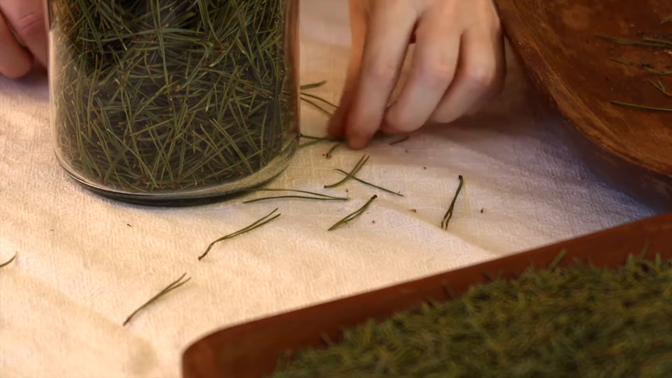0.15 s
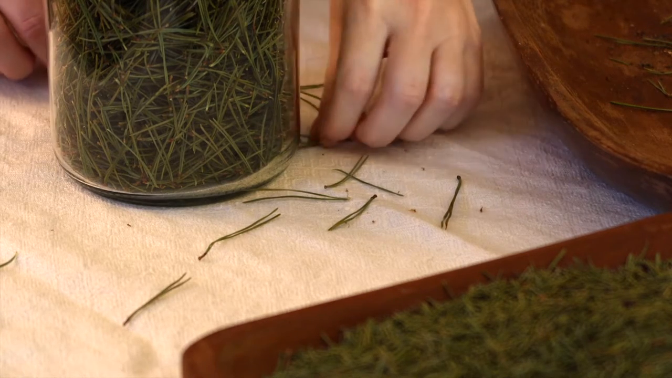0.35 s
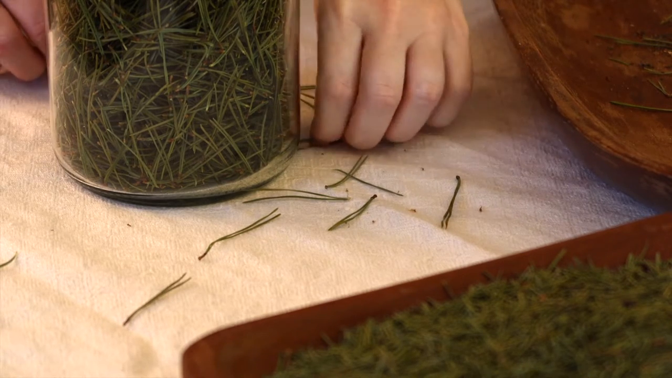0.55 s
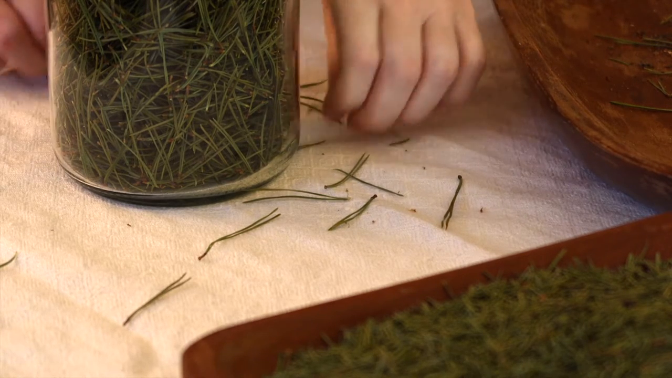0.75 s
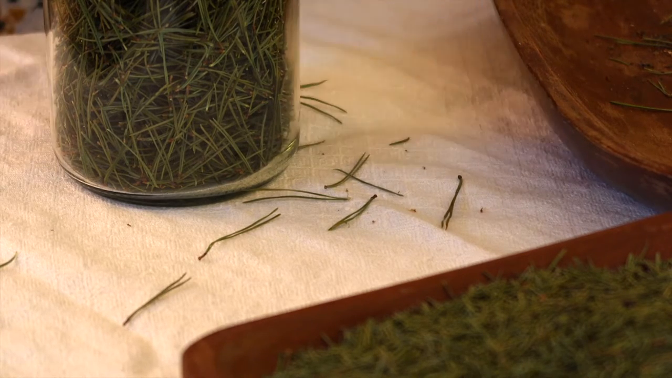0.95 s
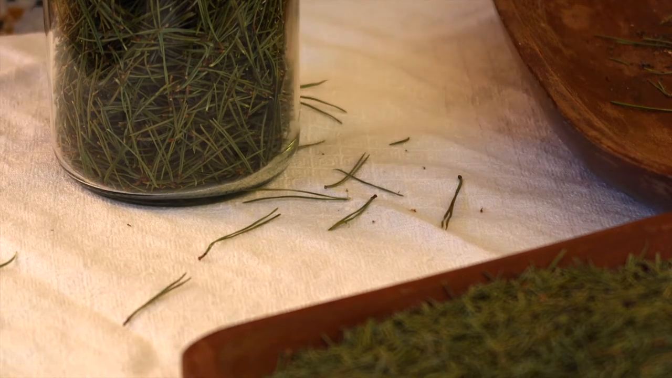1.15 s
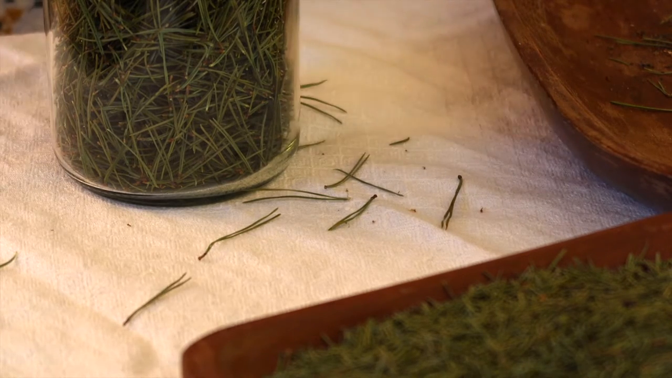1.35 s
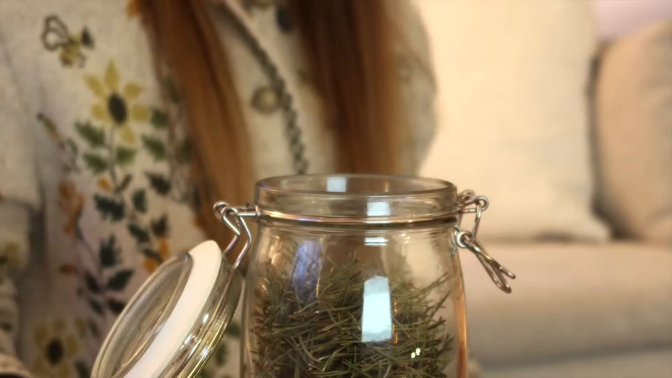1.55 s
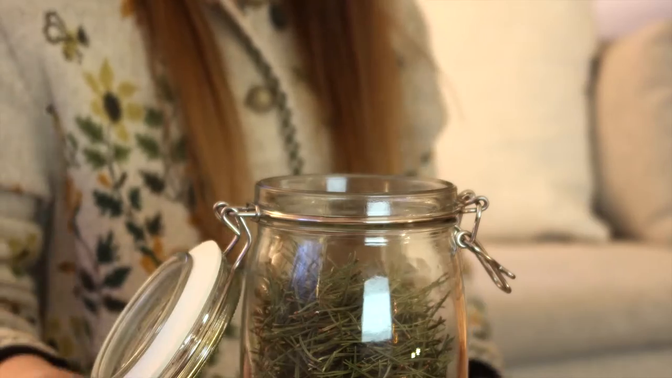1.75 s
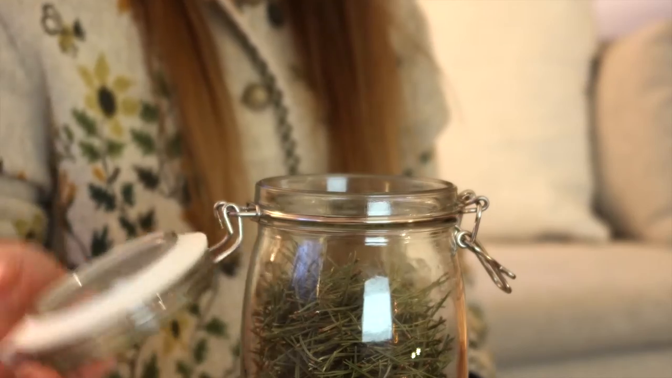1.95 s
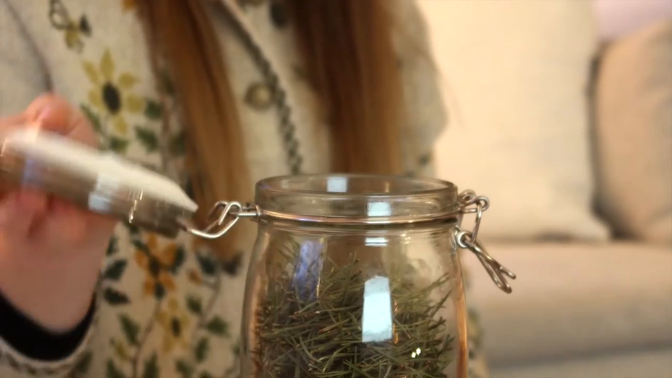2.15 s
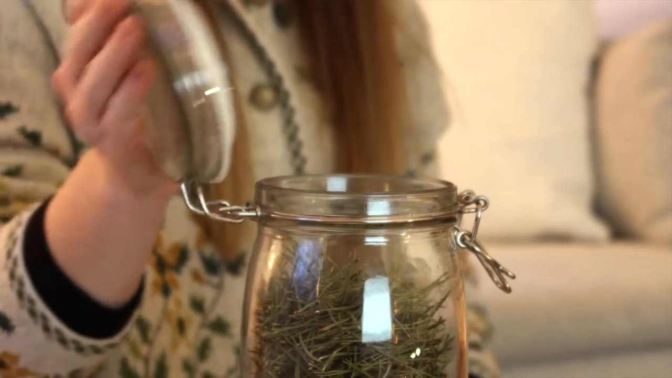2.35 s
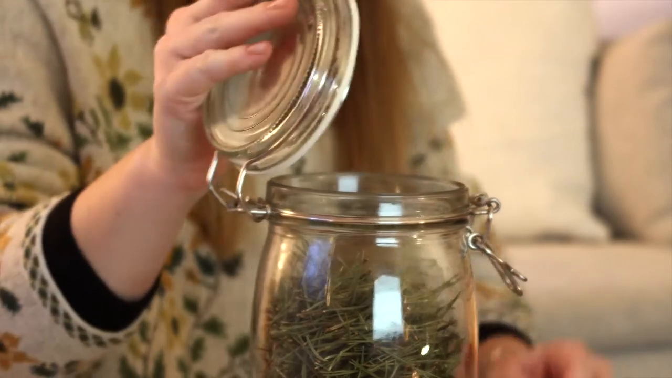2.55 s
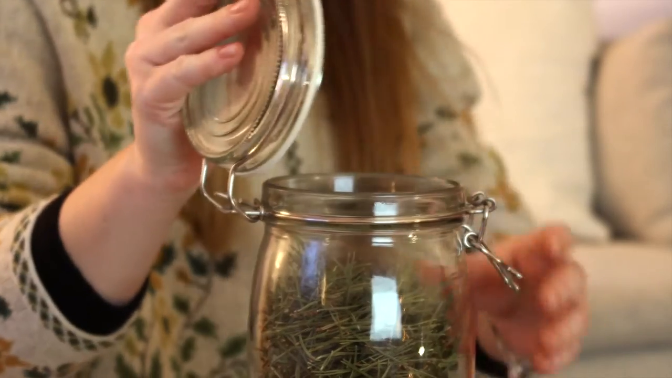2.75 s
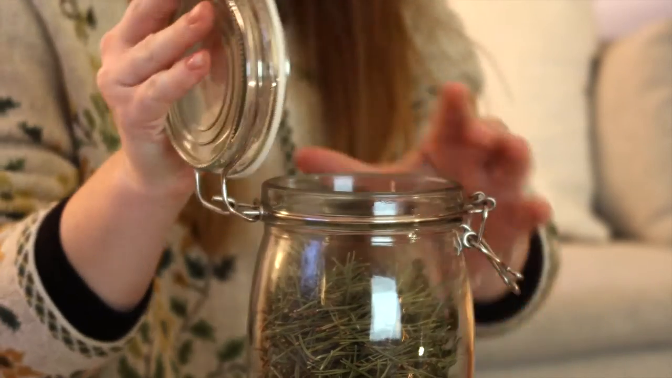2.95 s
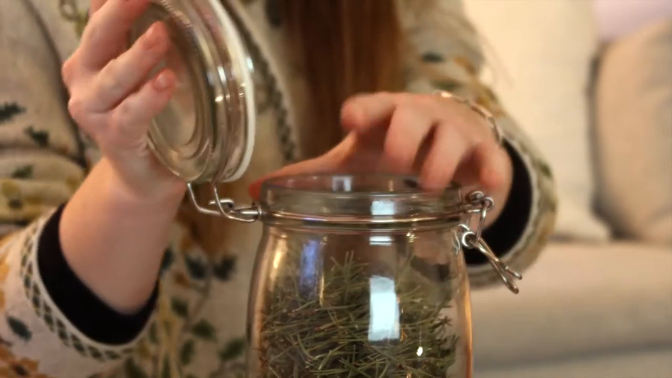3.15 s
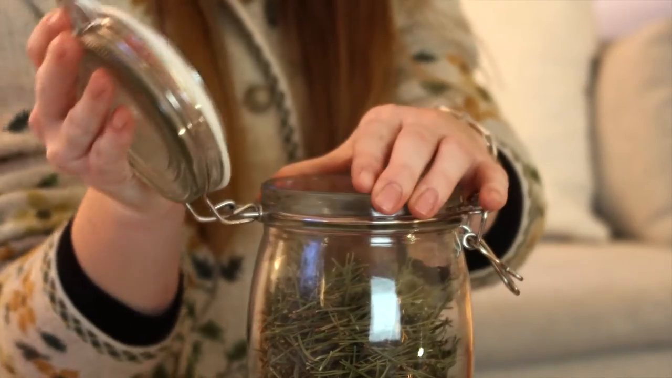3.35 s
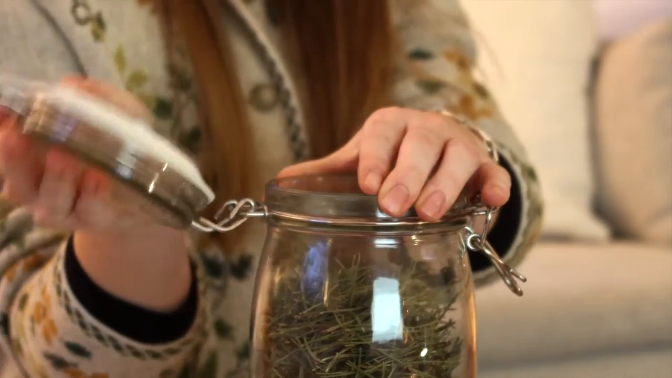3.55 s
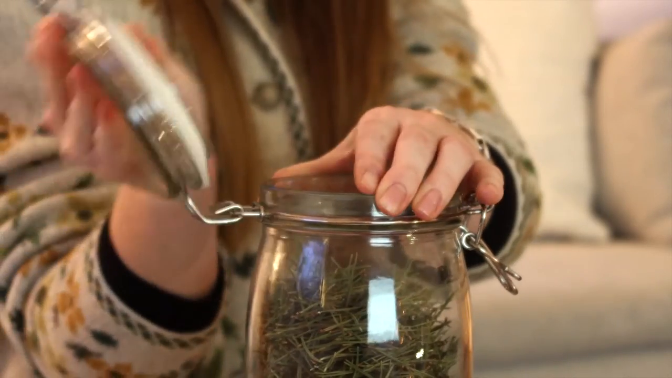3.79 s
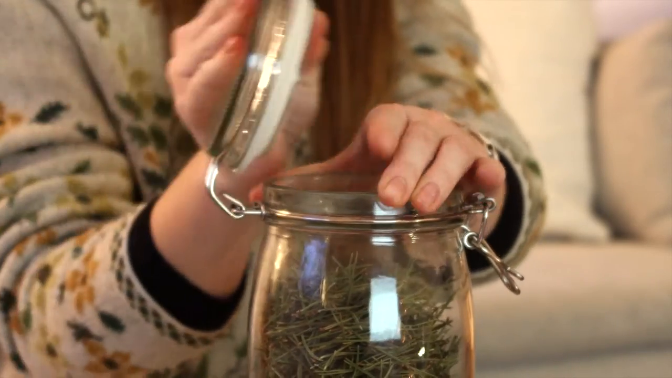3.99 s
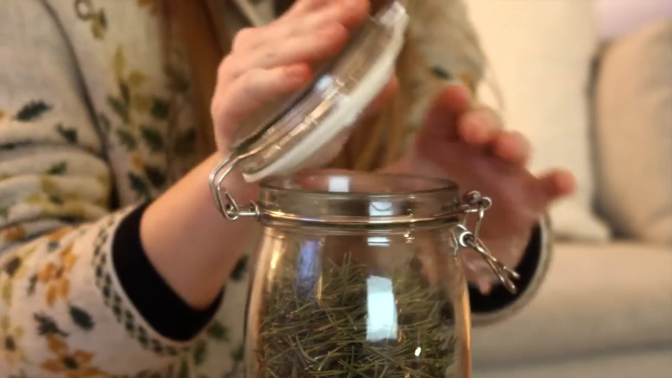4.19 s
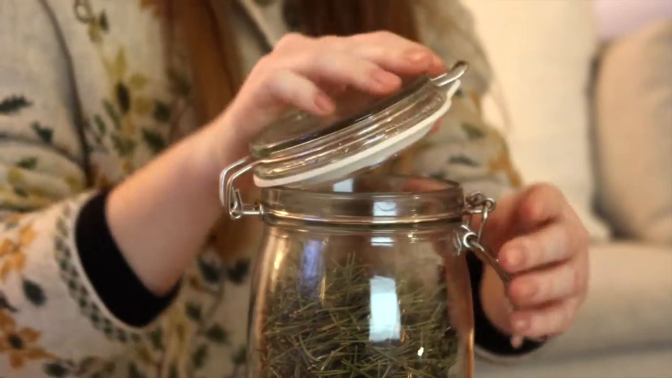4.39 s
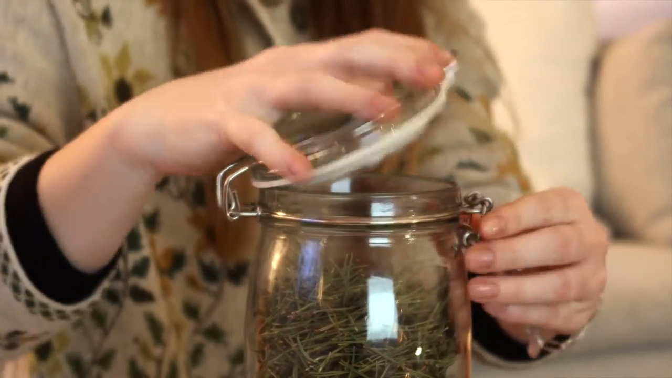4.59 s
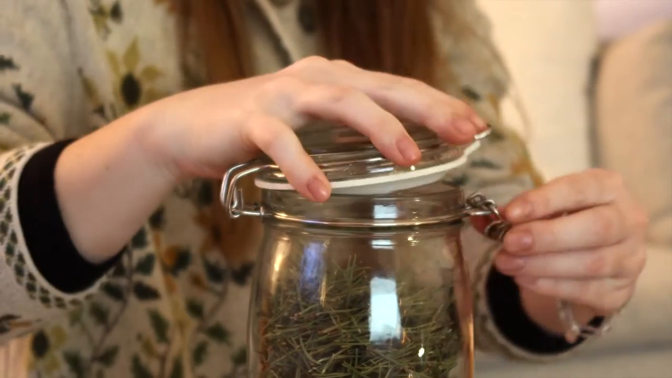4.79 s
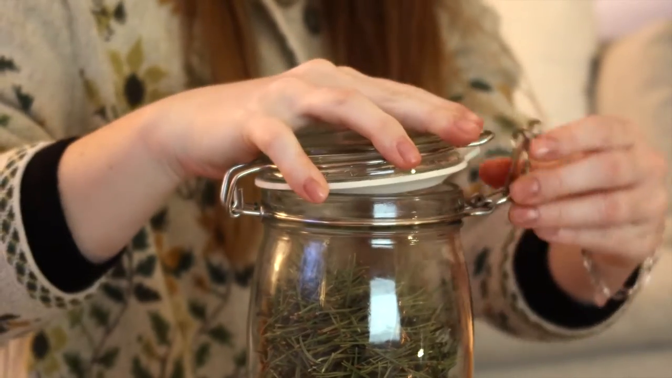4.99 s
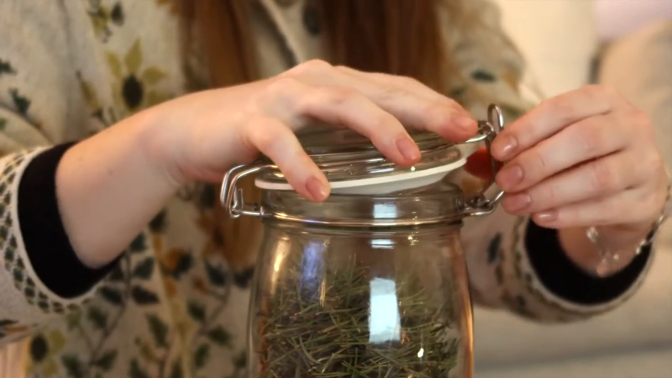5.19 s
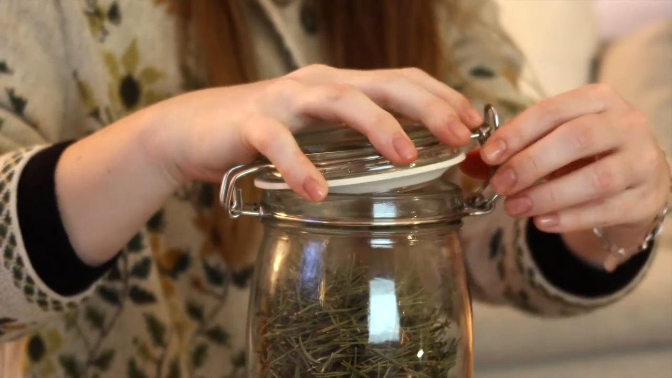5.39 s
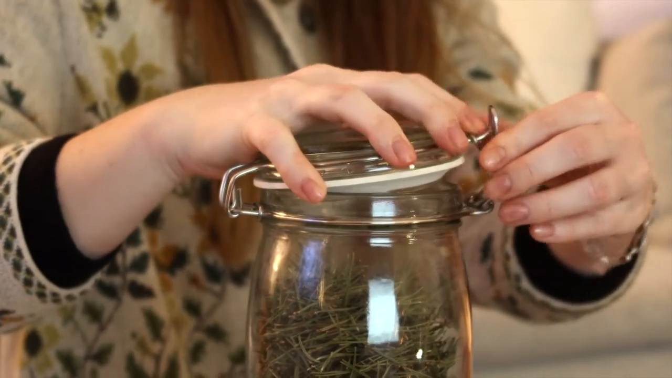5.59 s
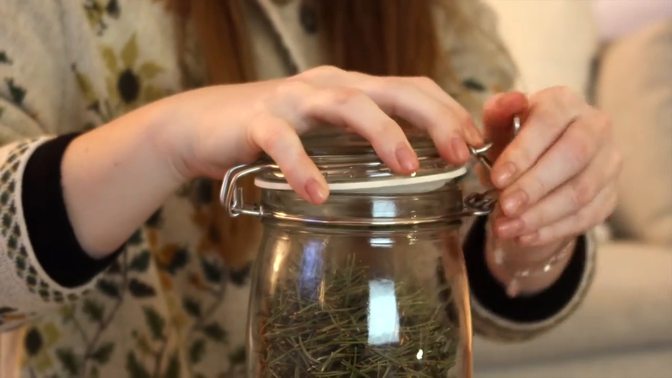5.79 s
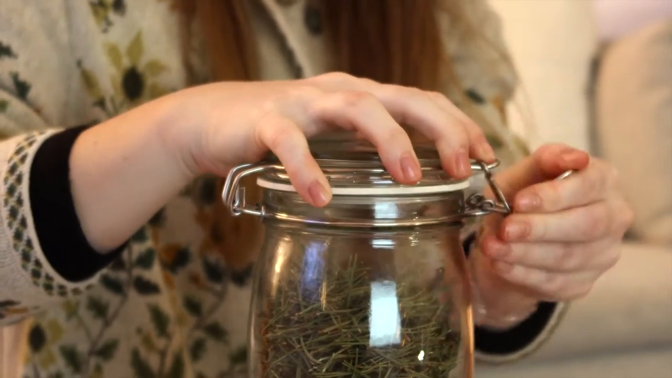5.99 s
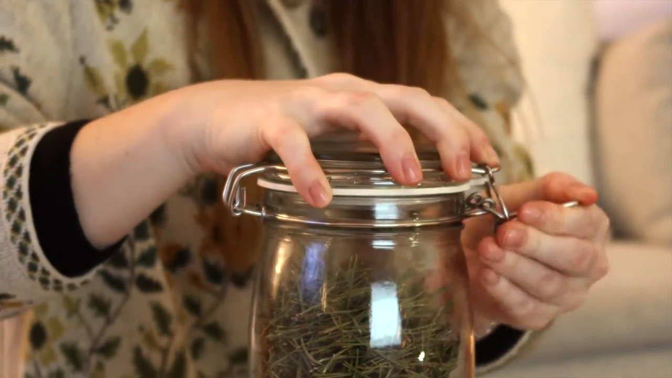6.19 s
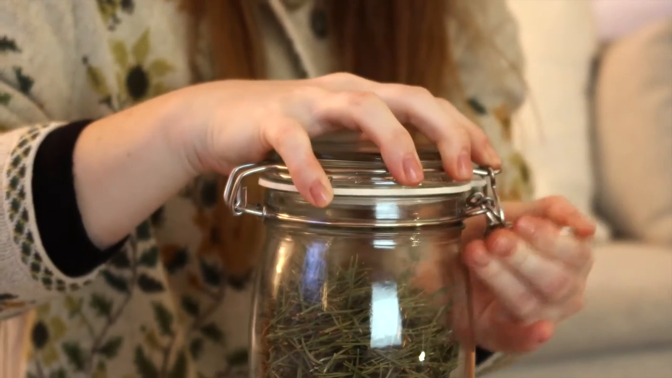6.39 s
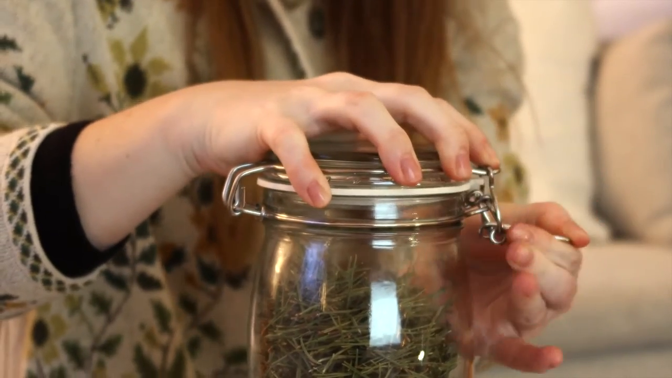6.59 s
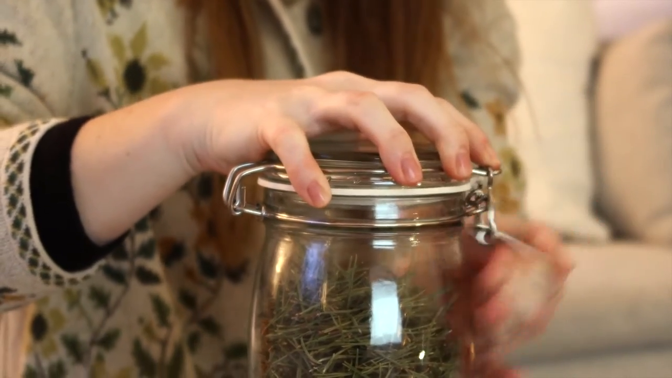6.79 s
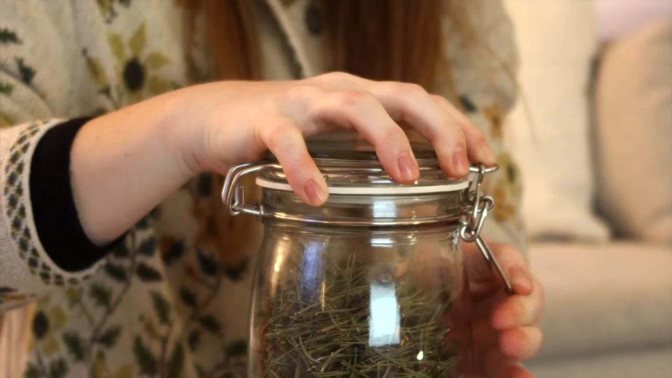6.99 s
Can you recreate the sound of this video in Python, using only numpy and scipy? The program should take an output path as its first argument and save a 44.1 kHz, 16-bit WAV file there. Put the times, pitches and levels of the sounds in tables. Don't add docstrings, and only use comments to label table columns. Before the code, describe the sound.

Close to the microphone in a soft-furnished living room, fingers sweep dry needles over cloth with faint ticks. After a near-silent pause, a hinged lid and wire clink brightly on a glass jar, with dull table thuds. Small taps and wire chatter follow as the lid settles. The clasp then snaps shut very loudly, followed by a lesser snap.

```python
import sys
import numpy as np
from scipy import signal
from scipy.fft import rfft, irfft
from scipy.io import wavfile

SR = 44100
rng = np.random.default_rng(int(sys.argv[2]) if len(sys.argv) > 2 else 0)


def field_ratio(decibels):
    return 10 ** (np.asarray(decibels, dtype=float) / 20)


def transcribe(signal):
    frames = np.atleast_2d(signal).T
    limited = np.clip(frames, -1, 1)
    pcm = np.round(limited * 32767).astype(np.int16)
    wavfile.write(sys.argv[1], SR, pcm)


N = 310596

# (frequency [Hz], level [dB], t60 [s])
WALL_MODES = [
    [(1305, -2, .11), (1337, 0, .11), (1330, 0, .035)],
    [(2105, 0, .07), (2140, -2, .06), (2172, -4, .08), (2130, 0, .025), (1760, -15, .018), (2700, -9, .018)],
    [(3668, 0, .115), (3696, -2, .1), (3300, -5, .025), (3650, 0, .03)],
    [(4655, -8, .09), (4712, -6, .1), (4805, -3, .11), (4890, -5, .09), (4965, -1, .11), (5022, 0, .08),
     (4850, 2, .022)],
]
WALL_GRIP = [0.81, 0.66, 0.63, 0.53]
WALL_BEAM_DB = [8.26, 11.96, 12.75, 14]


def at_hz(points, hz):
    table_hz, values = np.array(points).T
    return np.interp(np.log(np.maximum(hz, 1)), np.log(table_hz), values)


def band(x, low_hz, high_hz):
    return signal.sosfilt(signal.butter(2, [low_hz, high_hz], "band", fs=SR, output="sos"), x)


def rms_one(x):
    return x / np.sqrt(np.mean(x ** 2))


def clicks(seconds, gains):
    out = np.full(N, 1e-18)
    places = np.minimum((np.asarray(seconds) * SR).astype(int), N - 1)
    np.add.at(out, places, gains)
    return out


def pings(rows, rise_s):
    out, t = np.zeros(N + SR), np.arange(SR // 2) / SR
    for s, level_db, hz, t60 in rows:
        shape = (1 - np.exp(-t / rise_s)) * field_ratio(level_db - 60 * t / max(t60, .002))
        start = int(s * SR)
        out[start:start + len(t)] += shape * np.sin(2 * np.pi * hz * t)
    return out[:N]


def ring(hits, hz, r):
    w = 2 * np.pi * hz / SR
    return signal.lfilter([0, np.sin(w)], [1, -2 * r * np.cos(w), r * r], hits)


def strike(seconds, rings_db, families, grip, spread_db, lift_db, swells=False):
    swell_s, swell_share = 0.0013, 0.5
    out = np.zeros(N)
    luck = rng.standard_normal((len(seconds), 64))
    for k, family in enumerate(families):
        share = np.sqrt(np.sum(field_ratio(np.array(family)[:, 1]) ** 2))
        for m, (hz, level_db, t60) in enumerate(family):
            luck_db = spread_db * luck[:, 8 * k + m]
            strength = field_ratio(rings_db[:, k] + level_db + lift_db[k] + luck_db) / share
            hits = clicks(seconds + .0005, strength * np.sign(luck[:, 32 + 8 * k + m]))
            r = field_ratio(-60 / (t60 * grip[k] * SR))
            out += ring(hits, hz, r)
            if swells:
                out -= swell_share * ring(hits, hz, r * np.exp(-1 / (swell_s * SR)))
    return out


def family_db(touches):
    rows = np.array(touches)
    patterns = np.array([[1, 1, 1, 1],
                         [-1.5, -.5, .5, 1.5],
                         [1, -1, 1, -1],
                         [1, -1, -1, 1]])
    return rows[:, 0], rows[:, 1:] @ patterns[:rows.shape[1] - 1]


def crack(touches, low_hz, high_hz, t60, lift_db, rise_s=0.0017):
    rows = np.array(touches)
    hits = clicks(rows[:, 0] + 0.00057, field_ratio(rows[:, 1] + lift_db))
    burst = signal.lfilter([1], [1, -field_ratio(-60 / (t60 * SR))], hits)
    rise = np.exp(-1 / (rise_s * SR))
    burst = signal.lfilter([1 - rise], [1, -rise], burst)
    return band(burst * rng.standard_normal(N), low_hz, high_hz)


def dry_grains(per_s, spread_db):
    sizes = field_ratio(spread_db * rng.exponential(1, N).clip(0, 4))
    return (rng.random(N) < per_s / SR) * rng.standard_normal(N) * sizes


def hiss():
    # (frequency [Hz], level [dB])
    floor = [(15, -27), (25, 1.5), (48, -1.5), (223, -5.5), (309, -11), (734, -11.5), (988, -9),
             (1100, -14.5), (1560, -17), (4870, -19), (6920, -21.5), (12200, -22), (14800, -24),
             (16000, -20)]
    hz = np.fft.rfftfreq(N, 1 / SR)
    spectrum = rfft(rng.standard_normal(N)) * field_ratio(at_hz(floor, hz))
    return field_ratio(-65) * rms_one(irfft(spectrum, N))


def cloth():
    # (time [s], level [dB])
    effort = [(0.0, -81), (0.15, -75.5), (0.44, -62), (0.78, -73.5), (1.0, -78.5), (2.45, -72.5),
              (2.67, -66.5), (2.9, -80.5), (3.69, -70.5), (3.85, -73), (4.43, -74.5), (4.61, -71.5),
              (5.4, -68), (5.61, -71), (6.05, -70.5), (6.4, -79.5), (7.04, -103)]
    rustle_db, follows = -78, 0.49
    effort_db = np.interp(np.arange(N) / SR, *np.transpose(effort))
    lumps = field_ratio(2.0 * rms_one(band(rng.standard_normal(N), 5.6, 37.0)))
    low = rms_one(band(rng.standard_normal(N), 116, 389) * lumps)
    rustle = rms_one(signal.lfilter([1], [1, -.6], band(dry_grains(1500, 2.0), 400, 3930)))
    return field_ratio(effort_db) * low + field_ratio(rustle_db + follows * (effort_db - effort_db.mean())) * rustle


def sweep():
    # (pinch time [s], level [dB], lead-in [s])
    pinches = [
        (0.33, -73, 0.075),
        (0.465, -59, 0.18),
        (0.55, -66.5, 0.0078),
        (0.73, -73, 0.13),
    ]
    swell_db, fade_db_per_s = 20, 252
    scratch = rms_one(signal.lfilter([1], [1, -.7], band(dry_grains(2000, 1.9), 410, 5800)))
    t = np.arange(N) / SR
    strokes = np.zeros(N)
    for s, db, lead_s in pinches:
        strokes += field_ratio(db + np.minimum(swell_db * (t - s) / lead_s, fade_db_per_s * (s - t)))
    return strokes * scratch


def table():
    # (time [s], peak [dB], frequency [Hz])
    tick_rows = [
        (0.2994, -62, 2100),
        (0.4703, -47, 3080),
        (0.4864, -60, 2090),
        (0.5492, -53, 3300),
        (0.815, -44, 3060),
        (6.075, -72, 800),
        (6.244, -60, 964),
        (6.274, -48.5, 960),
        (6.341, -51, 899),
    ]
    # (time [s], peak [dB], frequency [Hz], t60 [s])
    thud_rows = [(0.445, -43, 217, 0.053), (0.553, -49.5, 166, 0.092), (1.898, -63, 164, 0.22),
                 (2.073, -50.5, 194, 0.05), (2.494, -48, 250, 0.051), (2.652, -54, 240, 0.078),
                 (3.232, -41, 233, 0.054), (3.553, -33.5, 208, 0.046), (3.67, -51, 242, 0.13),
                 (3.828, -58, 222, 0.11), (4.205, -61, 246, 0.074), (4.608, -51.5, 244.4, 0.19),
                 (4.651, -50.5, 211, 0.1), (4.731, -50.5, 222, 0.15), (5.163, -50, 220, 0.1),
                 (5.298, -56.5, 201, 0.29), (5.399, -58, 244, 0.15), (5.534, -50.5, 231, 0.075),
                 (5.562, -39.5, 200, 0.042), (5.597, -45.5, 199, 0.069), (5.745, -50.5, 195, 0.11),
                 (5.83, -78, 173, 0.12), (5.898, -57.5, 133, 0.29), (5.93, -52, 133.8, 0.13),
                 (5.63, -53, 205, 0.073), (5.7, -58, 205, 0.17), (5.975, -54.5, 218, 0.094),
                 (6.468, -51.5, 218, 0.17), (6.863, -47.5, 179, 0.34), (6.884, -36, 254, 0.049),
                 (6.924, -61, 129, 0.072)]
    # (time [s], peak [dB], frequency [Hz])
    bump_rows = [
        (1.901, -63, 71),
        (3.234, -57, 89),
        (3.552, -45, 91),
        (3.657, -58.5, 87),
        (5.581, -60.5, 59.2),
        (5.599, -68, 59.2),
        (6.863, -48.5, 81),
        (6.919, -54.5, 67.3),
        (6.999, -61, 37.7),
    ]
    ticks = pings([(s, db + 6, hz, 7. / hz) for s, db, hz in tick_rows], rise_s=.0002)
    thuds = field_ratio(5.0) * pings(thud_rows, rise_s=0.0034)
    bumps = pings([(s, db + 13.0, hz, 6.7 / hz) for s, db, hz in bump_rows], rise_s=0.01)
    return thuds + ticks, bumps


def room(x):
    # (frequency [Hz], t60 [s])
    decay = [(150, 0.45), (1000, 0.34), (4000, 0.29), (8000, 0.2), (16000, 0.21)]
    early_share, far_wall_s = 0.77, 0.024
    t, tail = np.arange(SR // 2) / SR, 0
    edges = 80 * 2 ** np.arange(0, 8, .5)
    for low_hz, high_hz in zip(edges, edges[1:]):
        fade = field_ratio(-60 * t / at_hz(decay, np.sqrt(low_hz * high_hz)))
        tail = tail + fade * band(rng.standard_normal(len(t)), low_hz, high_hz)
    first_wall = np.clip((t - .004) / 0.0016, 0, 1)
    far_walls = np.clip((t - far_wall_s) / 0.007, 0, 1)
    tail = tail * first_wall * (early_share + (1 - early_share) * far_walls)
    return field_ratio(-12) * signal.fftconvolve(x, tail / np.sqrt(np.sum(tail ** 2)))[:N]


def stray_rings():
    # (time [s], peak [dB], frequency [Hz], t60 [s])
    strays = [(0.353, -53, 2000, .01), (0.437, -52, 2870, 0.011), (0.5495, -47, 2520, .005),
              (5.742, -50, 3675, .2), (5.974, -58, 3675, 0.16), (2.6525, -34, 7930, .05),
              (2.748, -42, 4980, .1), (2.652, -42, 600, 0.01), (2.66, -44, 2135, 0.2),
              (2.653, -44, 2370, .09), (2.749, -42, 1365, 0.017), (3.55, -26.5, 1349, 0.076),
              (3.6545, -36, 4916, .025), (3.665, -28.5, 2160, 0.017), (3.818, -62, 1300, 0.091),
              (4.76, -58, 1700, .015), (5.1535, -38, 2160, 0.017), (5.296, -47, 1700, 0.022),
              (5.25, -54, 513, 0.034), (5.597, -43, 1352, 0.047), (5.972, -43, 1750, 0.016),
              (6.4708, -10.5, 4910, 0.029), (6.4745, -25.5, 3671, 0.1), (6.49, -35.5, 3714, 0.29),
              (6.488, -41, 2367, 0.16), (6.50, -34.5, 2110, 0.16), (6.926, -22, 2110, 0.015)]
    return pings(strays, rise_s=0.00038)


def knocks():
    # (time [s], peak [dB], frequency [Hz])
    knock_rows = [(0.446, -43.5, 627), (2.481, -50, 627), (3.549, -38.5, 308), (3.55, -53, 556),
                  (3.654, -45.5, 955), (5.596, -54, 890), (5.741, -44, 1090), (5.972, -53, 629),
                  (6.467, -27, 740), (6.86, -31, 630), (6.879, -31, 660), (6.922, -47, 710)]
    hollow = pings([(s + .0015, db + 2.5, hz, 9. / hz) for s, db, hz in knock_rows], rise_s=.0004)
    return hollow + crack(knock_rows, 370, 980, 0.05, lift_db=6)


def chinks():
    # (time [s], peak [dB], frequency [Hz], t60 [s])
    chink_rows = [
        (1.429, -48, 3180, 0.017),
        (2.5058, -39, 5540, .025),
        (3.55, -16, 5580, 0.012),
        (4.021, -52, 5600, .015),
        (4.078, -43, 5500, .015),
        (4.6554, -48, 5630, 0.022),
        (5.2951, -45, 6530, 0.048),
        (6.7344, -59, 5360, 0.015),
    ]
    return pings([(s, db - 7.5, hz, t60) for s, db, hz, t60 in chink_rows], rise_s=0.00047)


def wall_taps():
    # (time [s], strength [dB], hardness [dB per family],
    # place [dB, + belly, - shoulder], outer families [dB])
    swing = [(1.949, -73, -5.5, -3, -0.5), (2.4805, -65.5, -2.5, -5.5, 7.5), (2.4845, -68, 1, -11, 4.5),
             (2.5054, -64, 1, -2, 6), (2.517, -73.5, -7.5, -2.5, 8), (2.5444, -71, -1, 3, 2),
             (2.6524, -41, -4, -5, 0), (2.7468, -47, 3.5, 0, 0.5), (3.2258, -67.5, -5.5, -1.5, 1),
             (3.277, -69, 0.5, -1, -0.5), (3.3262, -75, -3, 2.5, 0), (3.4877, -69, -0.5, 0.5, 2),
             (3.5492, -45, -2.5, -0.5, 0.5), (3.5724, -59, 4, 5, 2.5), (3.5894, -58, 4.5, 7.5, 4),
             (3.6545, -53.5, 4.5, 2, 2.5), (3.6658, -56.5, -1.5, 5, -6), (3.9053, -75, 3, -1, 3.5),
             (4.021, -66, -3.5, -1.5, 2), (4.0779, -72, -3.5, -6, 7.5), (4.1038, -71, -6.5, -2, 0),
             (4.1288, -67, -0.5, -2, -0.0), (4.2056, -55, 0.0, -1.5, 2.5)]
    settle = [(4.567, -68.5, -4.5, -3, 4), (4.577, -46.5, 1.0, 1.5, -2), (4.5984, -58, -4, -7.5, 5),
              (4.6125, -51, 1, -2.5, -2), (4.6561, -71, -3, -1.5, 7.5), (4.704, -59.5, 2, -2.5, 2.0),
              (4.7204, -59.5, 5.5, -4.5, -5.5), (4.7374, -59.5, 0, 0, -4), (4.7614, -68, 3, 3, -14),
              (4.785, -64, 5, 4.5, 1.5), (4.8244, -60, 4.5, 4.0, -1), (4.8664, -68.5, 0, -0.5, 3),
              (4.916, -72, 1, 2, 6), (4.9626, -68, -2.5, -2.5, 1), (4.9847, -57, 0.5, 4, 0),
              (4.997, -65.5, -8, -2, -0.5), (5.0406, -77, -4.5, -1, 0), (5.156, -49.5, -4, -1, -1.5),
              (5.2044, -72, -3, -7, -5), (5.2507, -66.5, -5, -5.5, -2.5), (5.2951, -57.5, 2, 1.5, 2),
              (5.333, -61.5, -3, -4.5, -1), (5.372, -86, -10, 0, 9), (5.393, -82, -15, -5, 1.5),
              (5.411, -75.5, -14.5, -3.5, -3), (5.436, -72, -0.5, -8, -1)]
    clamp = [(5.521, -71, -10.5, -3, 1.5), (5.5334, -64.5, -3.5, -3, 1.5), (5.565, -51.5, -3.5, -3.5, 3.0),
             (5.5974, -60.5, -11, 2, -0.5), (5.6845, -84, -1.0, 1, 4), (5.723, -74, -7, 1.5, 6),
             (5.7365, -63, 0.5, 4, 5), (5.7406, -51, 0.5, 1.5, -1), (5.8344, -76, -1, -3, 1),
             (5.865, -74.5, -0.5, -6, 3.5), (5.8952, -88, -14, -2, 3), (5.921, -80, -9, 0, 4.0),
             (5.9724, -62, -1.5, -0.5, 0.5), (6.0753, -78, 1, 5, 4), (6.244, -76.5, 1, -1, 2.0),
             (6.4684, -40, -3, -1, 0), (6.4712, -52, 12, 8, -4), (6.7344, -86, -2.5, -9, 2),
             (6.8619, -57, -6, -4, -2.5), (6.88, -46, -3.5, -0.5, -3), (6.9223, -55, 5, -1, 3),
             (6.9264, -60, -9, 6, -1)]
    crack_db, crack_growth = 17, 0.21
    taps, wall_db = family_db(swing + settle + clamp)
    rings = strike(taps, wall_db, WALL_MODES, WALL_GRIP, spread_db=1.34, lift_db=WALL_BEAM_DB, swells=True)
    loudest_db = wall_db.max(axis=1)
    contact_db = loudest_db + crack_db + crack_growth * (loudest_db + 42.5)
    return rings, crack(np.c_[taps, contact_db], 1340, 4600, 0.013, lift_db=-7.0)


def lid_tinks():
    # (time [s], strength [dB], hardness [dB per family], place [dB], outer families [dB])
    tinks = [(2.4801, -47.5, 3.5, 0, 0), (2.5066, -54.0, 9, 2, -6), (2.5445, -67, -0.5, -3.5, -3.0),
             (2.6523, -29, -2.5, -3, 1), (2.7475, -40, 1, 3, -1), (3.4874, -65.0, -2, 6, -2),
             (3.5497, -40, 9.5, 9, -1), (3.573, -50, -1, 3, -3), (3.654, -49, 0.5, 1, -2),
             (3.6729, -53.5, 2, 6, 0), (4.0206, -68, 3.0, 2.5, -1.5), (4.078, -63.5, 5, 1.5, -1),
             (4.129, -71.0, -2.0, -0.5, -1.0), (4.2047, -53.5, -2, 4, -1), (4.5779, -47.5, -4, -2, 1.5),
             (4.5993, -54.0, 5, -0.5, 6), (4.6116, -51, -3, -2.5, 4), (4.622, -57, -1.5, -1, 6),
             (4.6557, -62, -2.5, 0, -2.5), (4.7006, -62, 0.5, 1.0, 1.5), (4.7211, -52.5, -0.5, -0.5, 5.5),
             (4.738, -70.5, 6, 2.5, 4.5), (4.7844, -60.5, 1.5, -1, -2), (4.8268, -59.5, 1.5, -6, -2),
             (4.985, -63, 2.0, 2, 6.5), (5.1546, -46.5, 6.5, 3.0, 3), (5.2938, -51.5, 0, -3, 4),
             (5.333, -64, 4, 3, 2), (5.5332, -64.0, 0.5, 2.0, 5), (5.5646, -48, 3.5, 1, -0.5),
             (5.7407, -55, 0, 3, -1.0), (5.9722, -66, 2.5, -0.5, 5), (6.4677, -27.5, 0, 2, -2),
             (6.8622, -62, -9, -6, -3), (6.8806, -62, -4.0, -2, -3.0), (6.9221, -31.5, 1, 3.5, 2)]
    # (frequency [Hz], level [dB], t60 [s])
    lid_modes = [
        [(5560, -5, .04), (5800, -8, .04), (6180, -3, .06), (6225, -2, .07), (6460, -5, .08), (6543, -3, .08)],
        [(7866, 0, .06), (7945, -5, .07), (8231, -5, .06), (8425, -9, .06), (8000, -2, .02)],
        [(9100, -8, .04), (9421, -5, .05), (9598, 2, .06), (9990, -6, .04), (10250, -8, .025),
         (10600, -8, .025)],
        [(11230, -4, .03), (11640, -4, .03), (12020, -1, .04), (12780, -4, .03), (13400, -5, .025),
         (14290, -3, .03), (15050, -2, .035), (15350, -5, .025)],
    ]
    seconds, lid_db = family_db(tinks)
    grip = [0.92, 0.8, 0.64, 0.57]
    rings = strike(seconds, lid_db, lid_modes, grip, spread_db=4.0, lift_db=[-6.0, -3.5, -6.0, 0.0])
    contacts = np.c_[seconds, lid_db.max(axis=1) + 5]
    return rings + crack(contacts, 3460, 21000, 0.036, lift_db=-12.0)


def bail():
    # (time [s], ring level [dB])
    bail_hits = [(2.505, -59), (2.746, -52), (3.665, -38.5), (4.078, -61), (4.574, -50), (4.8244, -53),
                 (4.9822, -55.5), (5.156, -50), (5.2513, -56), (5.5638, -55), (5.7414, -62), (6.4675, -39),
                 (6.86, -46), (6.9224, -38)]
    # (frequency [Hz], level [dB], t60 [s])
    bail_modes = [
        [(2391, 0, .17)],
    ]
    hits = np.array(bail_hits)
    return strike(hits[:, 0], hits[:, 1:], bail_modes, [1], spread_db=1.5, lift_db=[-2.5])


def scuffs():
    # (time [s], level [dB])
    scuff_rows = [(2.5058, -43), (2.5444, -50), (3.573, -34), (3.59, -38), (4.612, -45), (4.738, -50),
                  (4.785, -56), (4.822, -44), (4.83, -58), (4.998, -47), (5.247, -49), (5.257, -50),
                  (5.2951, -40.5), (5.7375, -41), (5.742, -44), (5.8344, -51), (5.925, -63), (5.94, -57),
                  (5.9724, -50), (6.244, -54), (6.274, -54), (6.8619, -32)]
    return crack(scuff_rows, 1300, 3900, 0.022, lift_db=2.0, rise_s=0.0018)


def slaps():
    # (time [s], level [dB])
    slap_rows = [
        (3.5492, -17),
        (6.4681, -6.5),
        (6.8619, -24),
        (6.88, -20),
        (6.9223, -13.5),
    ]
    return crack(slap_rows, 1430, 4600, 0.0059, lift_db=-5.0, rise_s=0.00019)


def chatter():
    # (start [s], end [s], strength [dB])
    spells = [
        (4.58, 4.755, -73),
        (5.167, 5.282, -75),
        (6.868, 6.916, -82),
        (4.804, 5.12, -87),
        (5.3, 5.45, -88),
        (5.764, 6.04, -85),
    ]
    touches_per_s = 70
    rows = []
    for start, end, strength_db in spells:
        span = end - start
        for moment, size, hardness, place in rng.random((int(span * touches_per_s), 4)):
            touch_db = strength_db + 12 * (size - .5)
            rows.append((start + span * moment, touch_db, 8 * (hardness - .8), 8 * (place - .6)))
    return strike(*family_db(rows), WALL_MODES, WALL_GRIP, spread_db=3.5, lift_db=WALL_BEAM_DB)


def clasp():
    # (frequency [Hz], t60 [s], first snap [dB], second snap [dB])
    clasp_modes = [(659, 0.026, -32.5, -40), (1060, 0.0084, -35.5, -34), (1347, 0.041, -20, -32),
                   (1750, 0.0032, -50, -46), (2110, 0.023, -22, -43), (2720, .007, -11, -30),
                   (3350, .008, -7, -17), (4640, .014, -15, -15), (4960, .014, -22, -25),
                   (3671, 0.053, -34, -27), (4530, .3, -37, -54), (4830, 0.39, -44, -45),
                   (4900, 0.33, -41, -42), (5000, .28, -44, -46)]
    snap_times = [
        6.4681,
        6.9226,
    ]
    rows = [(s, row[2 + k], row[0], row[1]) for k, s in enumerate(snap_times) for row in clasp_modes]
    return pings(rows, rise_s=.0002)


def scene():
    wood, bumps = table()
    wall_rings, wall_cracks = wall_taps()
    glass = wall_rings + lid_tinks() + chinks() + knocks() + stray_rings() + scuffs()
    snap = wall_cracks + slaps() + bail()
    closing = clasp()
    echoes = room(glass + wood + field_ratio(-4.0) * snap + field_ratio(-2) * closing)
    handling = cloth() + sweep() + chatter()
    return (hiss() + handling + wood + bumps + glass + snap + closing + echoes)[None]


def top_cut(x):
    return signal.sosfilt(signal.butter(12, 16760, fs=SR, output="sos"), x)


def record(dry):
    overload, cutoff_hz = .335, 16300
    shaved = dry - dry / (1 + (np.abs(dry) / overload) ** 4) ** .25
    high_pass = signal.butter(2, 250, "high", fs=SR, output="sos")
    held = dry - signal.sosfilt(high_pass, shaved)
    low_pass = signal.cheby2(10, 60, cutoff_hz + 600, fs=SR, output="sos")
    return top_cut(signal.sosfilt(low_pass, held))


dry = scene()
out = record(dry)
transcribe(out)
```